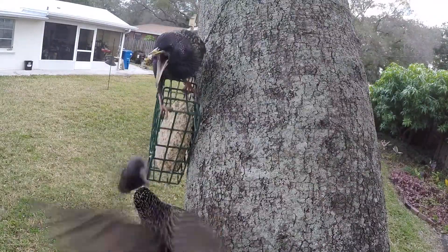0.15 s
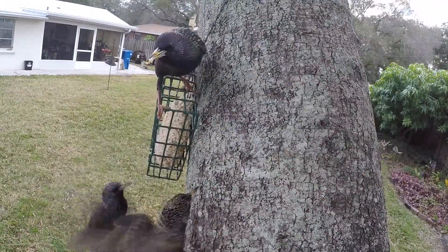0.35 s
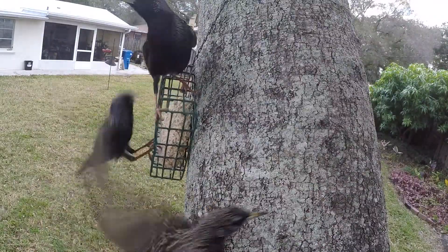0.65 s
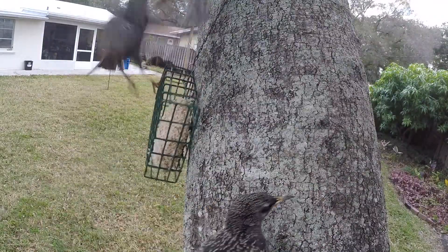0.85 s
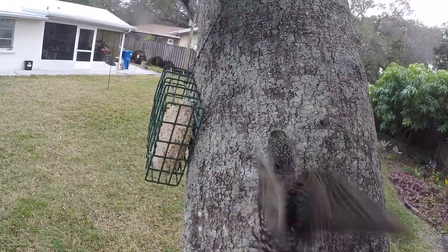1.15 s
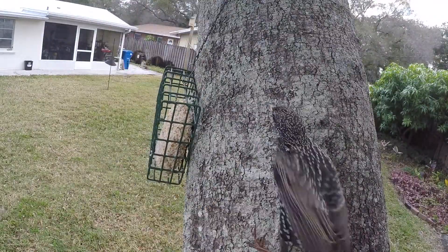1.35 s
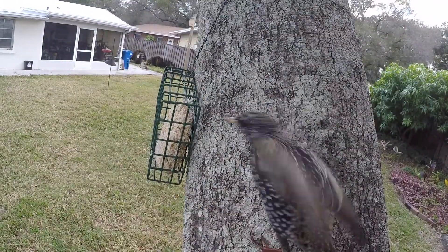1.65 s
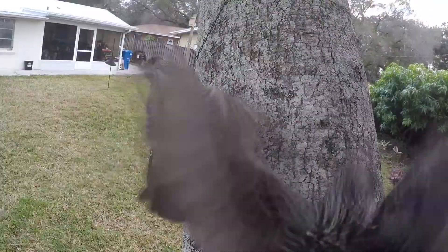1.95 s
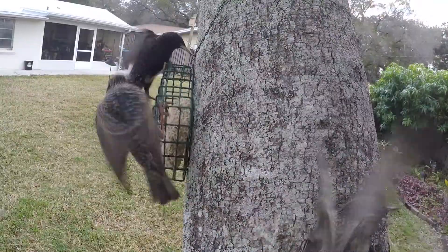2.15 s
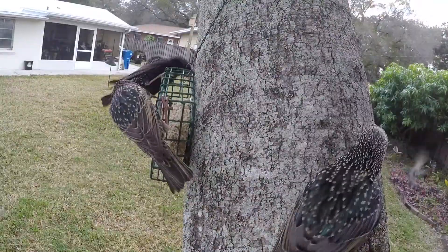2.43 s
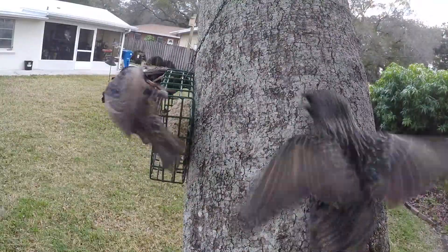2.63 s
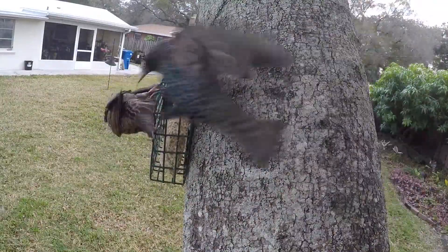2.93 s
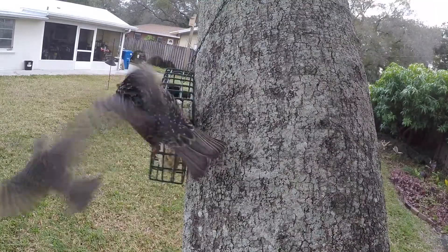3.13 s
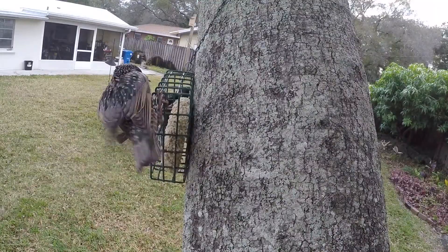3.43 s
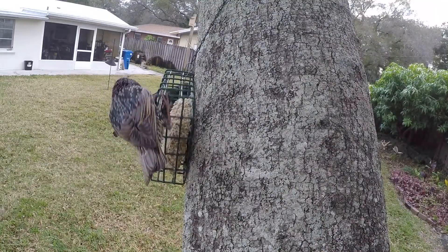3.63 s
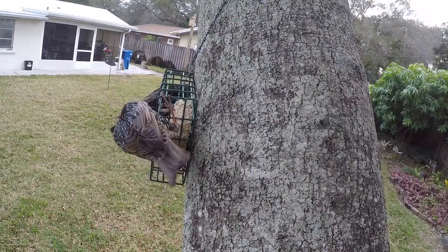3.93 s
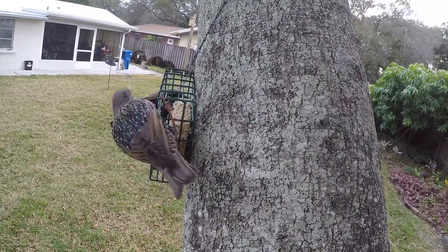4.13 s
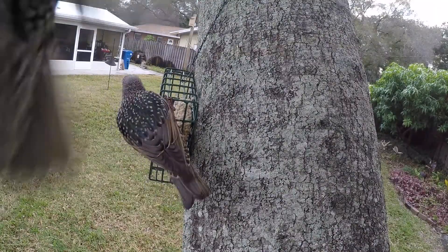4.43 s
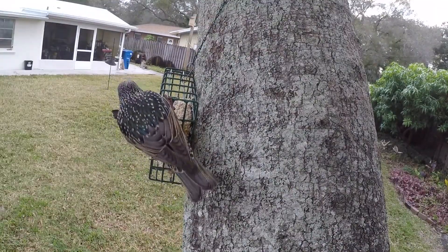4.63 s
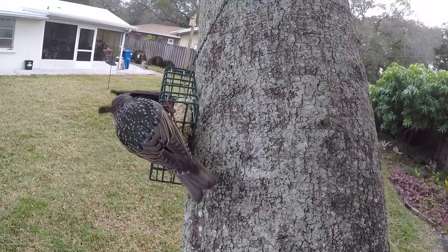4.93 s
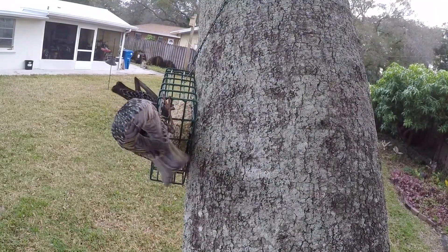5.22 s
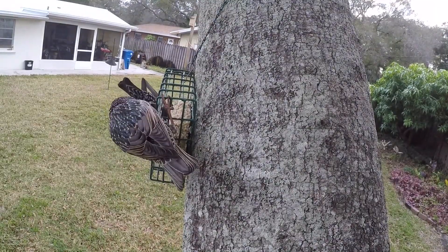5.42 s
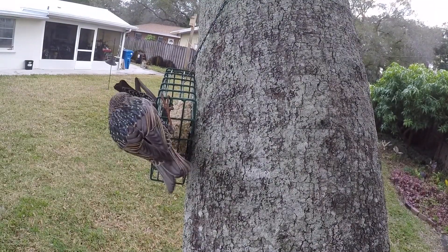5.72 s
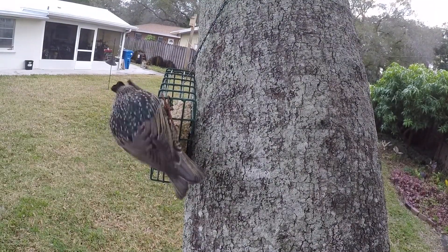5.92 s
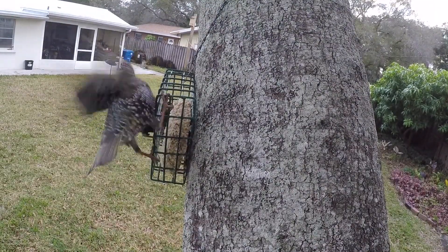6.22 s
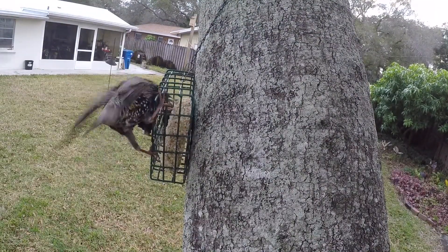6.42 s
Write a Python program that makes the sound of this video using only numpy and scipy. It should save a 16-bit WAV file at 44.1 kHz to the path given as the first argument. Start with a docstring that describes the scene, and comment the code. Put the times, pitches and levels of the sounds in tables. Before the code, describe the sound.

Starlings squabble close to the microphone in a garden, over faint hiss, a low breeze and a thin insect tone. They open with a short screech and bright whistles. Wing beats push air at the microphone around 0.4 seconds, with a trill, then a throbbing rasp until 1.1. Buzzes, squeaks and rising whistles follow until 1.6. Near 1.9 come light knocks on plastic, a tiny ping from a wire feeder and a strong gust of wings. Trills and a screech follow just after 2, another rasp at 2.6, and a combined whistle and squeal around 3.2. After a lull, a rush of wings and a very loud knock land at 4.5 seconds. Claws and feathers keep tapping and scraping the microphone's plastic housing until about 5.6. From 5.7, trills, screeches and scattered taps run to the end at about 6.6 seconds.

```python
"""Starlings squabble at a suet cage on a garden tree. Over faint hiss, a breeze and an insect's thin tone,
they open with a screech and whistles; wing beats push air at the microphone, and a trill and a throbbing
rasp follow. After a second come buzzes and squeaks, then knocks on the plastic housing, and a foot rings
the cage. Past 3 s one bird whistles and squeals at once, using both sides of its syrinx. From 4.4 s claws
and feathers knock and scrape the housing in earnest, and trills and screeches close the scene."""
import sys
import numpy as np
from scipy import signal
from scipy.fft import rfft, irfft
from scipy.io import wavfile

SR = 44100
rng = np.random.default_rng(int(sys.argv[2]) if len(sys.argv) > 2 else 0)


def output_pcm(signal):
    """Save a mono or channel-first signal as 16-bit PCM at the path in sys.argv[1].

    Samples are clipped to [-1, 1] before scaling.
    """
    pcm = np.clip(np.atleast_2d(signal).T, -1, 1) * 32767
    wavfile.write(sys.argv[1], SR, np.round(pcm).astype(np.int16))


N = 289737

# spectrum of the garden hiss: frequency_hz, relative_db
HISS_SPECTRUM = [(150, -9.5), (300, -2), (1500, -6.5), (3900, 0), (5000, -9), (9000, -11.5), (15000, -21)]
# course of the hiss, faintest near the end: time_s, level_db
HISS_LEVELS = [(0, -56.5), (2.4, -63.5), (4.4, -61.5), (4.6, -64), (5.65, -81), (6.57, -58)]
# steady airflow at the microphone: time_s, level_db
BREEZE_LEVELS = [(0, -48), (1.6, -44), (2.55, -53), (3.3, -48), (3.9, -57), (5, -46), (6.57, -51)]
# flurries of wing beats: peak_s, peak_db, rise_db_per_s
FLURRIES = [(.43, -32, 90), (1.13, -31, 200), (1.72, -29, 400), (1.85, -30, 100), (1.97, -20, 250),
            (4.44, -29, 110), (4.47, -17, 900), (5.0, -39, 100), (5.46, -29, 120), (6.2, -43, 200),
            (6.51, -43, 300)]
# spectrum of air buffeting the microphone: frequency_hz, relative_db
AIR_SPECTRUM = [(15, -9), (47, 5.5), (85, -3.5), (113, -18), (150, -11.5), (230, -32.5), (900, -75)]
# harsh, unthrobbing calls: start_s, length_ms, level_db
SCREECHES = [(0, 60, -41), (2.105, 110, -35), (2.97, 75, -45), (3.055, 55, -50), (3.51, 66, -49.5),
             (6.115, 86, -46), (6.25, 190, -50), (6.5, 160, -44)]
# clear whistles: (start_db, middle_db, end_db, second_harmonic_db, third_harmonic_db),
# then the contour: time_s, pitch_hz
WHISTLES = [((-26, -34, -47, -17.5, -46), [(.016, 4500), (.024, 4670), (.045, 4430)]),
            ((-29, -28, -38, -23, -50), [(.011, 5040), (.029, 8100), (.043, 8600), (.054, 7800)]),
            ((-24, -12, -12, -26, -38), [(.054, 4860), (.059, 7230), (.066, 8700), (.073, 6800)]),
            ((-23, -32, -29, -16.5, -20), [(.066, 5380), (.1, 5490), (.118, 4850), (.145, 4590),
            (.168, 4450)]), ((-17, -13.5, -18, -27.5, -20), [(.079, 3900), (.099, 3880), (.115, 4047),
            (.207, 4105), (.218, 3670)]), ((-42, -23, -28, -13, -48), [(1.15, 5520), (1.175, 6100),
            (1.195, 6300), (1.225, 6680)]), ((-34, -27, -21, -29.5, -46), [(1.545, 5780), (1.555, 6010),
            (1.585, 6630), (1.625, 7350), (1.631, 7440)]), ((-28, -33, -39, -24, -46), [(3.113, 5800),
            (3.13, 5760), (3.148, 6400), (3.2, 6450), (3.245, 6900), (3.285, 6450), (3.315, 7070),
            (3.338, 5200)])]
# tone colour of the calls and their echoes, brightest near 4 kHz: frequency_hz, gain_db
CALL_COLOUR = [(800, -32), (2000, 2), (3000, -1.5), (4100, 7), (5500, -5), (8000, -8), (14000, -39.5)]
# wing tips passing close by: start_s, length_ms, level_db
THUMPS = [(.41, 22, -34), (1.94, 34, -33)]
# trills: (start_s, length_s, crest_s, beats_per_s, crest_gain_db, slope_db_per_octave,
# crest_change_db_per_octave), resting pitch (start_hz, middle_hz, end_hz), leap (start_hz, end_hz),
# source level (start_db, middle_db, end_db)
TRILLS = [((.432, .083, .472, 62, -2, -9, -60), (2374, 2100, 2130), (1200, 1800), (-46, -50, -52)),
          ((2.036, .11, 2.057, 71.1, 2, -16, -40), (2450, 2400, 2100), (1000, 1600), (-47, -40, -46)),
          ((2.15, .155, 2.254, 71.1, 10, -2, -40), (2250, 2550, 2950), (1600, 1400), (-43, -37, -36)),
          ((4.285, .145, 4.311, 61, 0, -9, -60), (2010, 2145, 2270), (500, 1000), (-61, -58.5, -59)),
          ((5.708, .082, 5.73, 71, -4, -30, -30), (1770, 2100, 2240), (270, 1400), (-54, -51, -51)),
          ((5.822, .164, 5.849, 54.5, 2, -12, -30), (1850, 2000, 2140), (1050, 950), (-39, -38, -42)),
          ((6.118, .14, 6.19, 65, 0, -16, -30), (2110, 2580, 2600), (700, 1500), (-43, -46, -55)),
          ((6.26, .23, 6.467, 65, -2, -6, 5), (2650, 2650, 2700), (1200, 1300), (-49, -47, -47)),
          ((6.525, .05, 6.545, 62, 6, -9, -20), (2430, 2570, 2590), (620, 620), (-44, -24, -21))]
# throbbing calls: (start_s, length_s, start_throbs_per_s, end_throbs_per_s, start_db, full_db, end_db,
# swell_s, shut_db, first_pitch_hz, later_pitch_hz, end_voicing_db), then frequency_hz, relative_db
RASPS = [((.585, .507, 49.7, 45.4, -43, -30, -39, .45, -12, 1880, 1400, 5), [(700, -33.5), (1850, -12.5),
         (2300, -14), (2870, -1), (3250, -7), (3900, 4.5), (4800, -16.5), (5450, -8), (6800, -15),
         (15000, -37)]), ((2.585, .285, 55.5, 42.3, -45, -36, -33, .07, -22, 1850, 1850, 3), [(700, -37.5),
         (1740, -17), (2300, -29), (3950, 1), (4980, -26), (5590, -15.5), (6950, -38.5), (15000, -47.5)])]
# shaken whistles: start_s, length_s, start_hz, middle_hz, end_hz, swing_hz, level_db
BUZZES = [(1.178, .088, 3915, 3916, 3600, 170, -20), (1.27, .05, 4160, 4060, 3650, 130, -19.5),
          (1.374, .05, 4180, 3880, 3790, 210, -14), (1.416, .04, 3850, 4100, 4470, 210, -19),
          (1.463, .048, 4134, 4060, 3550, 370, -22)]
# short falling notes: start_s, length_ms, start_hz, end_hz, source_db, slope_db_per_octave
SQUEAKS = [(1.413, 21.6, 1360, 1294, -37, -.5), (1.433, 16.4, 3320, 3110, -26, -.5),
           (1.441, 17.6, 1044, 884, -40.5, -.5), (1.463, 26.5, 1925, 1845, -40, -8),
           (2.123, 39, 1540, 1460, -33, -6), (2.982, 22, 1450, 1200, -40, -2),
           (2.998, 14, 3250, 2950, -35, -14), (3.052, 24, 1150, 1030, -35, -30)]
# blows on the housing: start_s, strength_db
KNOCKS = [(1.473, -16), (1.839, -9), (1.852, -6), (1.904, -3), (4.456, -13.5), (4.468, 23.5), (4.491, 9),
          (4.584, 10), (4.6, -4), (4.661, -4), (4.77, -5), (4.774, -4.5), (4.98, -4.5), (5.002, -15),
          (5.023, 8.5), (5.109, -20), (5.296, -18), (5.33, -5.5), (5.357, -4), (5.4, -9), (5.422, -2),
          (5.457, 13.5), (5.584, -11), (5.807, -14), (5.83, -12), (5.912, -15), (6.168, -4.5), (6.349, -3),
          (6.389, -18), (6.397, 0.5), (6.43, -20), (6.489, -5), (6.498, -8)]
# modes of the plastic housing: frequency_hz, bandwidth_hz, gain_db
HOUSING_MODES = [(140.5, 34.4, -13), (660, 400, -12.5), (1340, 263, -4.5), (1861, 115, -1),
                 (2568, 340, -4.5), (3970, 770, -4), (5556, 230, -10), (7170, 640, -8.5),
                 (12310, 9000, -12.5)]
# claws and feathers dragged over the housing: start_s, length_ms, strength_db, treble_db
SCRAPES = [(1.847, 42, -26.5, 3), (4.472, 80, -19.5, -5), (4.591, 25.5, -22, -1.5), (4.62, 36, -34, -25.5),
           (4.677, 9.5, -18.5, -3.5), (4.688, 51, -33, -15), (4.778, 10.2, -18.5, -32),
           (4.793, 24.7, -26.5, -15), (4.914, 26, -26, -16), (4.944, 40.6, -30.5, -27),
           (5.027, 51.4, -27, -16.5), (5.108, 34.6, -37, -24), (5.174, 45, -43.5, -33),
           (5.241, 22, -26.5, -30), (5.325, 10, -21, -18.5), (5.343, 29.2, -18.5, -0.5),
           (5.376, 36, -21.5, -28), (5.397, 28.3, -15, -2.5), (5.427, 7.3, -21.5, -20),
           (5.46, 21.7, -16, -5.9), (5.487, 37, -22, -14.5), (5.499, 40.8, -23.5, -7),
           (5.545, 22, -26, -10), (5.787, 29, -24, -14.5), (6.5, 40, -38, -12)]
# the moment a foot strikes the wire cage, and its modes: frequency_hz, level_db
CAGE_STRIKE_S, CAGE_MODES = 1.876, [(1330, -12), (4550, -10.5)]
# the lower voice under the last whistle: time_s, pitch_hz, level_db, warble_depth_hz
SQUEAL = [(3.19, 3250, -52, 60), (3.245, 3150, -33, 280), (3.28, 2750, -40, 60), (3.312, 2400, -50, 30)]


def amp(db):
    """Decibels to amplitude ratio."""
    return 10 ** (np.asarray(db) / 20)


def rms_one(x):
    """Normalise to an rms of 1."""
    return x / np.sqrt(np.mean(x ** 2) + 1e-20)


def at_hz(spectrum, hz):
    """Interpolate a spectrum on a log-frequency axis."""
    frequencies, db = np.transpose(spectrum)
    return np.interp(np.log(hz), np.log(frequencies), db)


def coloured(spectrum, size=N):
    """Spectral shaping of white noise, rms 1."""
    hz = np.maximum(np.fft.rfftfreq(size, 1 / SR), 1)
    return rms_one(irfft(rfft(rng.standard_normal(size)) * amp(at_hz(spectrum, hz)), size))


def drift(corner_hz, size=N):
    """Random fluctuation: low-passed noise, rms 1."""
    r = np.exp(-2 * np.pi * corner_hz / SR)
    return rms_one(signal.lfilter([1], [1, -2 * r, r * r], rng.standard_normal(size + 4000))[4000:])


def lowpass(x, hz):
    """Second-order roll-off above hz."""
    return signal.sosfilt(signal.butter(2, hz, fs=SR, output="sos"), x)


def span(rows):
    """Sample indices under rows of (time_s, ...), the interpolated columns, and a 1.4 ms edge fade."""
    s, *columns = np.transpose(rows)
    at = np.arange(round(s[0] * SR), min(round(s[-1] * SR), N))
    fade = np.clip(np.minimum(at / SR - s[0], s[-1] - at / SR) / .0014, 0, 1)
    return at, [np.interp(at / SR, s, c) for c in columns], fade


def contour(values, size):
    """Straight lines through evenly spaced values."""
    return np.interp(np.linspace(0, len(values) - 1, size), range(len(values)), values)


def eased(size, attack_s, release_s):
    """Trapezoidal envelope."""
    t = np.arange(size) / SR
    return np.clip(np.minimum(t / attack_s, (size / SR - t) / release_s), 0, 1)


def bursts(rows, roundness=0.):
    """Flat or arched envelopes from rows of start_s, length_ms, level_db."""
    out = np.zeros(N)
    for s, ms, db in rows:
        at, (turn,), fade = span([(s, 0), (s + ms / 1000, np.pi)])
        out[at] += amp(db) * fade * np.abs(np.sin(turn)) ** roundness
    return out


def phase_of(hz):
    """Phase is the integral of frequency."""
    return 2 * np.pi * np.cumsum(hz) / SR


def voice(hz, partials_db, stretch=1):
    """Additive synthesis: partial k lies at k ** stretch times the pitch, with rms 1 at 0 dB."""
    phase = phase_of(hz)
    return np.sqrt(2) * sum(amp(db) * np.sin(k ** stretch * phase) * (k * hz < .45 * SR)
                            for k, db in enumerate(partials_db, 1))


def call_partials(hz, count, slope_db):
    """Spectral envelope: partial levels from a slope per octave plus the tone colour of the calls."""
    return [at_hz(CALL_COLOUR, k * hz) + slope_db * np.log2(k) for k in range(1, count + 1)]


def garden():
    """Ambient noise: flickering broadband hiss and an insect's nearly pure tone share one envelope."""
    level = amp(np.interp(np.arange(N) / SR, *np.transpose(HISS_LEVELS)))
    insect = amp(-14 + 2.7 * drift(30)) * np.sin(phase_of(8631 + 8 * drift(40)))
    hiss = coloured(HISS_SPECTRUM) * amp(2.5 * drift(18))
    return level * (hiss + insect)


def moving_air(fall_db_per_s=75):
    """Turbulence: breeze and wing flurries rumble at the microphone, and feathers rustle in step."""
    t = np.arange(N) / SR
    db = np.interp(t, *np.transpose(BREEZE_LEVELS))
    for s, peak_db, rise_db_per_s in FLURRIES:
        db = np.maximum(db, peak_db - np.maximum(rise_db_per_s * (s - t), fall_db_per_s * (t - s)))
    rumble = amp(db + 2 * drift(6.2)) * coloured(AIR_SPECTRUM)
    rustle = amp(np.minimum(db, -36) - 24 + 6 * drift(30)) * lowpass(coloured(HISS_SPECTRUM), 4500)
    return rumble + rustle


def screeches():
    """Aperiodic voicing: arched bursts of noise with the spectrum of the first rasp."""
    return bursts(SCREECHES, roundness=.8) * coloured(RASPS[0][1]) * amp(.83 * drift(150))


def whistles(strain_hz=7400, strain_db_per_khz=-14):
    """Nearly sinusoidal oscillation of the syrinx, wavering a little and weakening above strain_hz."""
    out = np.zeros(N)
    for (*levels_db, second_db, third_db), pitches in WHISTLES:
        at, (hz,), _ = span(pitches)
        size = len(at)
        db = contour(levels_db, size) + strain_db_per_khz * np.maximum(hz - strain_hz, 0) / 1000
        waver = 1 + .0097 * drift(120, size)
        level = eased(size, attack_s=.004, release_s=.004) * amp(db + 1.8 * drift(66, size))
        out[at] += level * voice(hz * waver, [0, second_db, third_db])
    return out


def echoes(calls, t60_s=.25, level_db=-32.5):
    """Reverberation: scattered reflections from trunk, house and fence decay exponentially."""
    t = np.arange(round(.4 * SR)) / SR
    tail = coloured(CALL_COLOUR, len(t)) * amp(-60 * t / t60_s) * (t > .004)
    return amp(level_db) * signal.fftconvolve(calls, tail / np.sqrt(np.sum(tail ** 2)))[:N]


def wing_thumps():
    """Pressure pulses: a wing tip close by gives a short burst of dull noise."""
    noise = coloured([(250, -14), (600, 5), (1500, -8), (5000, -48)])
    return bursts(THUMPS, roundness=.7) * noise * amp(drift(80))


def trills():
    """Pulsed frequency modulation: the pitch leaps on each beat, and the overtone mostly fades with it."""
    out = np.zeros(N)
    for (s, length, crest_s, beats_per_s, crest_db, slope_db, change_db), *shapes in TRILLS:
        at, _, _ = span([(s, 0), (s + length, 0)])
        size, full_size = len(at), round(length * SR) + 1
        rest_hz, leap_hz, db = [contour(shape, full_size)[:size] for shape in shapes]
        leap = np.abs(np.cos(np.pi * beats_per_s * (at / SR - crest_s))) ** 5
        hz = rest_hz + leap_hz * leap + 65 * drift(500, size)
        partials_db = call_partials(hz, count=2, slope_db=slope_db + change_db * leap)
        db = db + crest_db * leap - 22 * leap * (1 - leap) + 3.6 * drift(300, size)   # dips mid-leap
        fade = eased(full_size, attack_s=.006, release_s=.006)[:size]
        out[at] += fade * amp(db) * voice(hz, partials_db)
    return out


def rasps(open_share=.85, voicing_growth_db=12):
    """Amplitude modulation: the syrinx opens and shuts, chopping noise and a hoarse tone into throbs."""
    out = np.zeros(N)
    for (s, length, start_per_s, end_per_s, start_db, full_db, end_db,
         swell_s, shut_db, first_hz, later_hz, voicing_db), spectrum in RASPS:
        at, (db,), _ = span([(s, start_db), (s + swell_s, full_db), (s + length, end_db)])
        size = len(at)
        throb, progress = np.divmod(np.cumsum(np.linspace(start_per_s, end_per_s, size)) / SR, 1)
        noise = coloured(spectrum, size)
        low = lowpass(noise, 3400)
        low_db, high_db = 2 * rng.standard_normal((size, 2))[throb.astype(int)].T   # drawn per throb
        high_db = high_db + .5 * (db - db.max())   # brighter as it swells
        noise = amp(low_db) * low + amp(high_db) * (noise - low)
        aim_hz = np.where(throb < .4 * throb.max(), first_hz, later_hz)
        sag = .1 * (.4 - progress) - .12 * (throb == throb.max())   # each throb falls; the last is lower
        hz = aim_hz * (1 + sag + .03 * drift(30, size) + .035 * drift(400, size))
        partials_db = [at_hz(spectrum, k * aim_hz) - 8 * (k == 1) for k in range(1, 6)]
        tone = amp(np.linspace(voicing_db - voicing_growth_db, voicing_db, size)) * voice(hz, partials_db)
        arch = np.abs(np.sin(np.pi * np.minimum(progress / open_share, 1))) ** .7
        gate = eased(size, attack_s=.002, release_s=.008) * (amp(shut_db) + arch)
        out[at] += gate * amp(db + 1.2 * drift(200, size)) * (noise + tone)
    return out


def buzzes(shakes_per_s=350):
    """Modulation sidebands: one side of the syrinx shakes the pitch and level of the other's whistle."""
    out = np.zeros(N)
    for s, length, start_hz, middle_hz, end_hz, swing_hz, db in BUZZES:
        at, (hz,), _ = span([(s, start_hz), (s + length / 2, middle_hz), (s + length, end_hz)])
        size = len(at)
        shake = np.sin(phase_of(shakes_per_s * (1 + .12 * drift(200, size))))
        level = amp(db + 1.4 * drift(200, size)) * (1 + .3 * shake)
        hz = hz + swing_hz * shake
        lower_partials = voice(hz + 60 * drift(320, size), [0, -21], stretch=.92)   # inharmonic
        top_partial = voice(3.1 * (hz + 150 * drift(600, size)), [-36])
        fade = eased(size, attack_s=.008, release_s=.3 * length)
        out[at] += fade * level * (lower_partials + top_partial)
    return out


def squeaks():
    """Linear frequency sweep: six harmonics glide down together under a rounded envelope."""
    out = np.zeros(N)
    for s, ms, start_hz, end_hz, db, slope_db in SQUEAKS:
        at, (hz, turn), _ = span([(s, start_hz, 0), (s + ms / 1000, end_hz, np.pi)])
        level = amp(db + 2.8 * drift(150, len(at))) * np.abs(np.sin(turn)) ** .2
        partials_db = call_partials(hz, count=6, slope_db=slope_db)
        out[at] += level * voice(hz + 30 * drift(420, len(at)), partials_db)
    return out


def knocks(decay_s=.0011):
    """Impact excitation: each blow is a brief chatter of force that dies exponentially."""
    force, t = np.zeros(N), np.arange(600) / SR
    for s, db in KNOCKS:
        at = round(s * SR)
        force[at:at + len(t)] += amp(db - 13) * rng.standard_normal(len(t)) * np.exp(-t / decay_s)
    return force


def housing(force, treble_force):
    """Modal resonance: low modes of the plastic follow the force, high modes its sharp part."""
    out = np.zeros(N)
    for k, (hz, width_hz, db) in enumerate(HOUSING_MODES):
        r = np.exp(-np.pi * width_hz / SR)
        drive = force if hz < 5000 else treble_force
        ring = signal.lfilter([1, 0, -1], [1, -2 * r * np.cos(2 * np.pi * hz / SR), r * r], drive)
        out += (-1) ** k * amp(db + 2.8 * drift(40)) * np.sqrt(1 - r) * ring
    return out


def jolts(band_hz=(60, 170), fall_db_per_s=110):
    """Damped vibration: the mount shudders after each knock, disproportionately after hard ones."""
    s, db = np.transpose(KNOCKS)
    kicks = np.zeros(N)
    kicks[(s * SR).astype(int)] = amp(1.4 * db - 52)
    envelope = signal.lfilter([1], [1, -amp(-fall_db_per_s / SR)], kicks)
    band = signal.butter(4, band_hz, "band", fs=SR, output="sos")
    return envelope * rms_one(signal.sosfilt(band, rng.standard_normal(N)))


def scrapes(snags_per_s=500):
    """Stick-slip friction: uneven slips and sharp snags give a force and its treble part."""
    def grip(rows):
        """Contact bites at once and relaxes over a few ms."""
        pressure = bursts(rows)
        return np.maximum(pressure, signal.lfilter([.005], [1, -.995], pressure))

    slips = rng.standard_normal(N) * amp(3.5 * drift(180))
    snags = 1 + 4 * (rng.random(N) < snags_per_s / SR)
    low_grip = grip([row[:3] for row in SCRAPES])
    treble_grip = grip([(s, ms, db + treble_db) for s, ms, db, treble_db in SCRAPES])
    return amp(-9) * slips * np.sqrt(snags) * low_grip, amp(-1.5) * slips * snags * treble_grip


def cage_ring(rise_s=.0013):
    """Free vibration: struck by a foot, the wire cage rings in two modes for a few ms."""
    out, t = np.zeros(N), np.arange(600) / SR
    at = round(CAGE_STRIKE_S * SR)
    envelope = t / rise_s * np.exp(1 - t / rise_s)
    for hz, db in CAGE_MODES:
        out[at:at + len(t)] += amp(db) * envelope * np.sin(2 * np.pi * hz * t)
    return out


def squeal(warbles_per_s=150):
    """Combination tones: a sinking second voice mixes with the last whistle at their sum and difference."""
    at, (hz, db, warble_hz), fade = span(SQUEAL)
    t, size = at / SR, len(at)
    whistle_hz = np.interp(t, *np.transpose(WHISTLES[-1][1]))
    hz = hz + warble_hz * np.sin(2 * np.pi * warbles_per_s * t) + 25 * drift(400, size)
    combination = voice(whistle_hz - hz, [0]) + voice(whistle_hz + hz, [-14])
    level = fade * amp(db + 1.5 * drift(200, size))
    out = np.zeros(N)
    out[at] = level * (voice(hz, [0, -6]) + np.linspace(0, 1, size) * combination)
    return out


def scene():
    """Superposition: the calls arrive with echoes; contacts, air and garden arrive directly."""
    calls = whistles() + buzzes() + trills() + squeal() + squeaks() + rasps() + screeches()
    birds = calls + echoes(calls)
    blows = knocks()
    friction, friction_treble = scrapes()
    contacts = housing(blows + friction, amp(-2.5) * blows + friction_treble) + cage_ring() + jolts()
    return (birds + contacts + moving_air() + wing_thumps() + garden())[None]


def record(dry):
    """Clipping and band limiting: the loudest knocks flatten, and the top treble is cut."""
    treble_cut = signal.cheby2(12, 80, 16900, fs=SR, output="sos")
    return signal.sosfilt(treble_cut, np.clip(dry, -.87, .87))


dry = scene()
out = record(dry)
output_pcm(out)
```